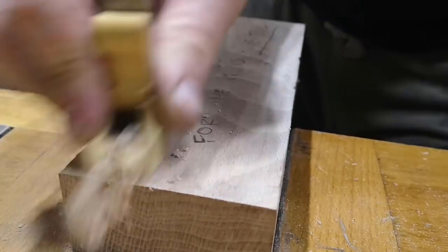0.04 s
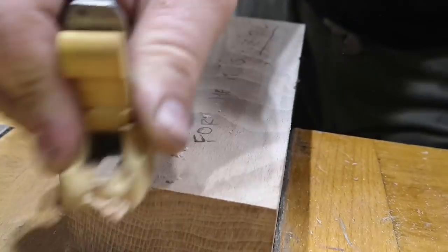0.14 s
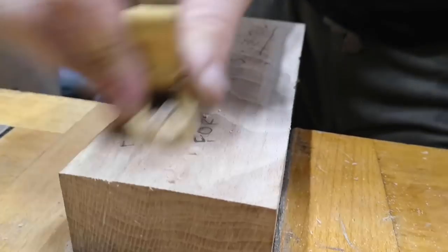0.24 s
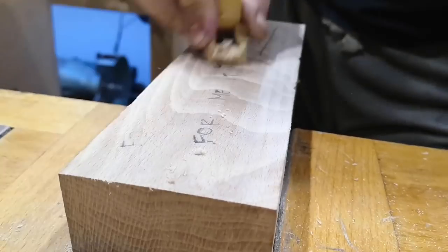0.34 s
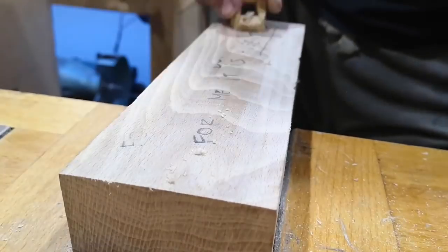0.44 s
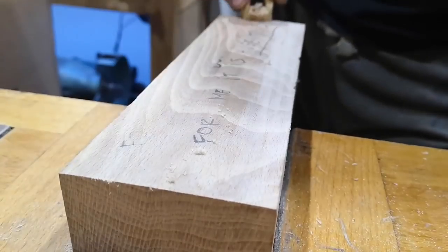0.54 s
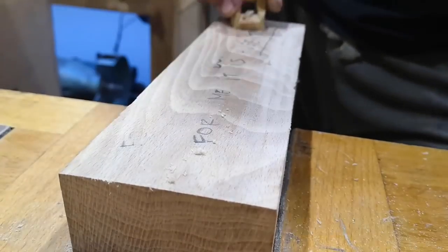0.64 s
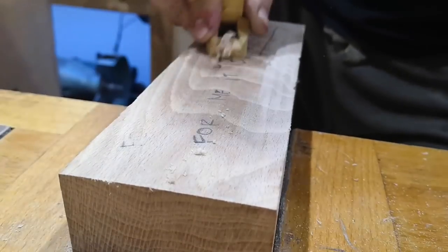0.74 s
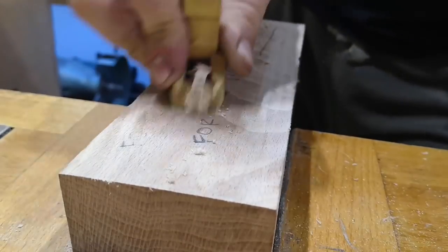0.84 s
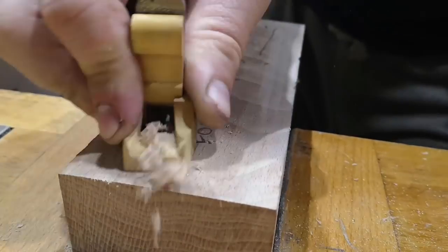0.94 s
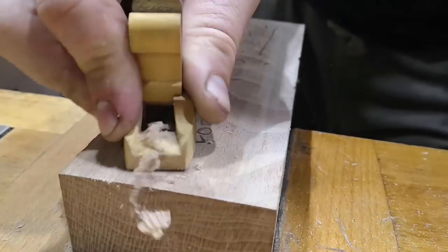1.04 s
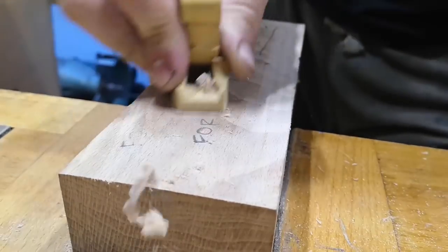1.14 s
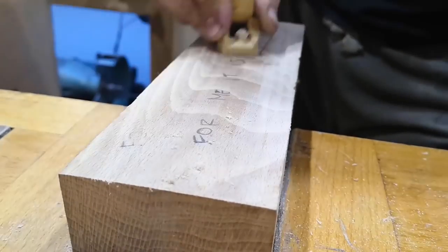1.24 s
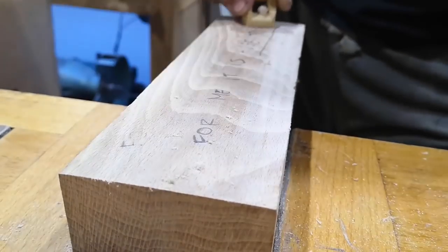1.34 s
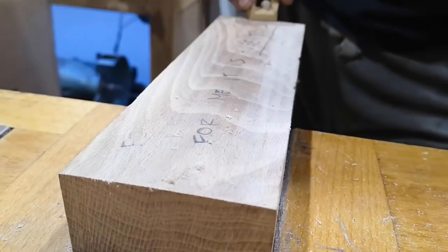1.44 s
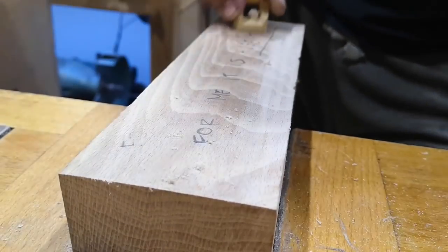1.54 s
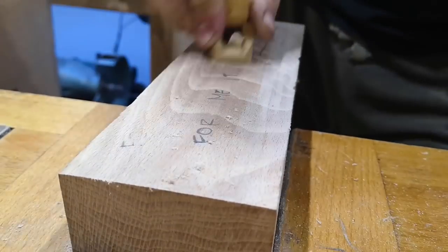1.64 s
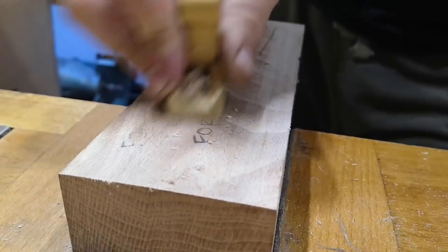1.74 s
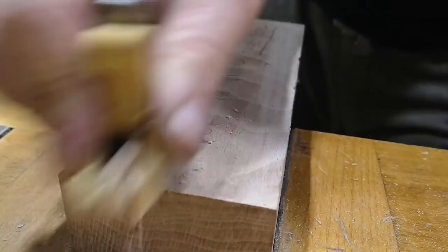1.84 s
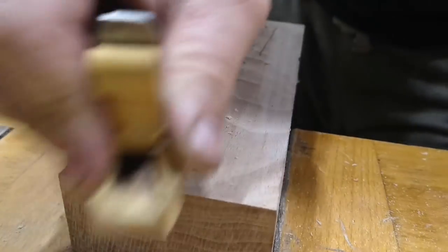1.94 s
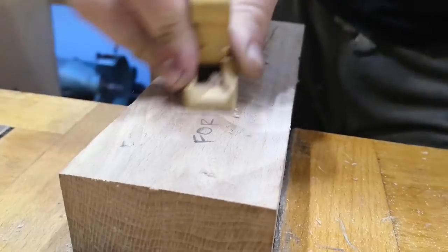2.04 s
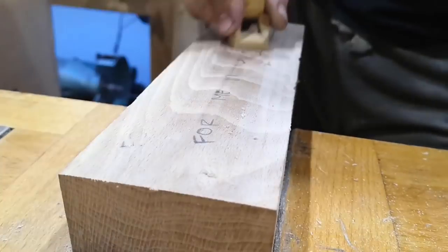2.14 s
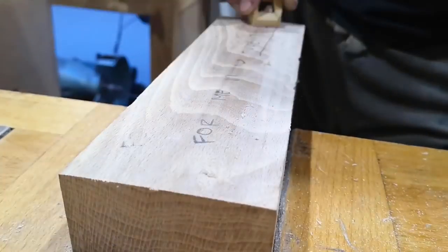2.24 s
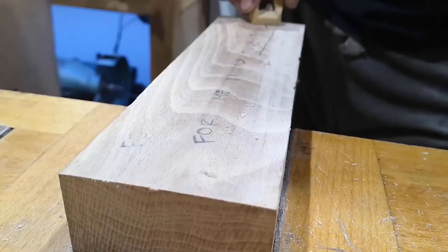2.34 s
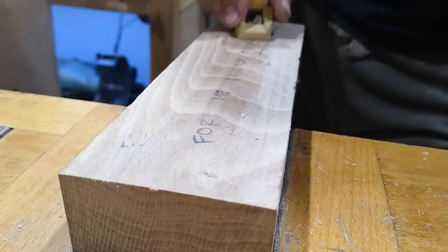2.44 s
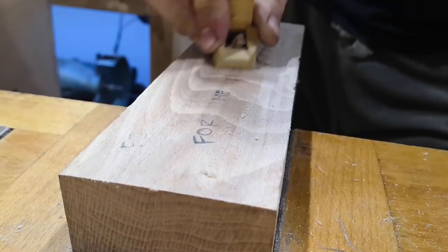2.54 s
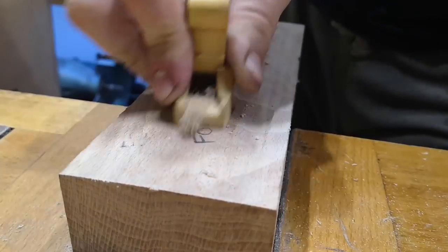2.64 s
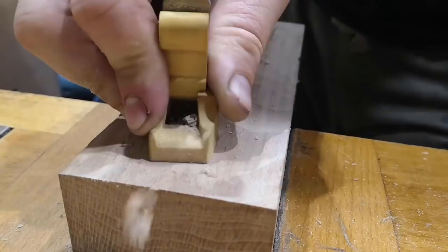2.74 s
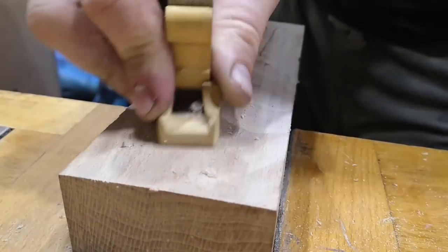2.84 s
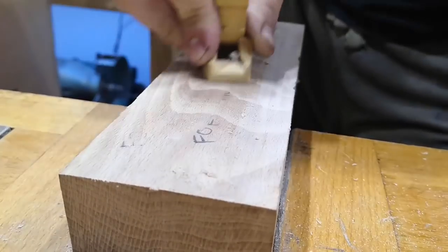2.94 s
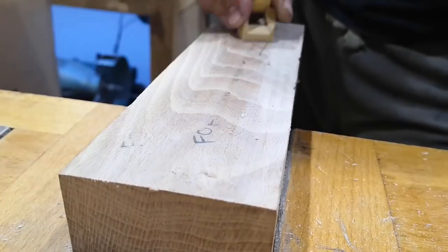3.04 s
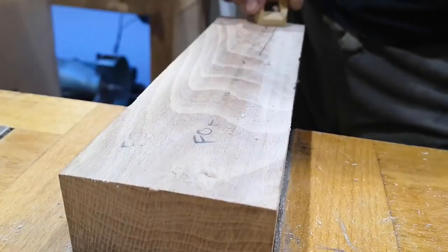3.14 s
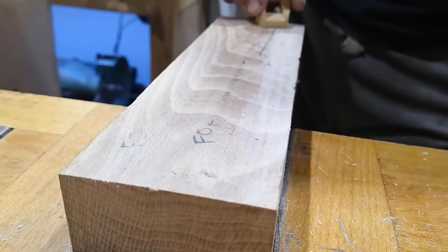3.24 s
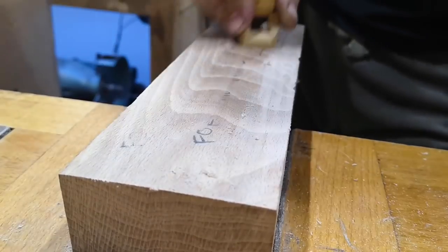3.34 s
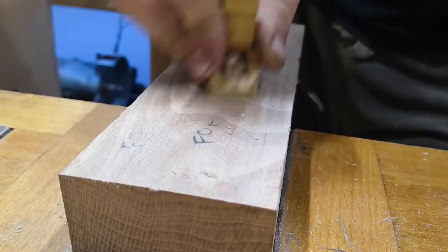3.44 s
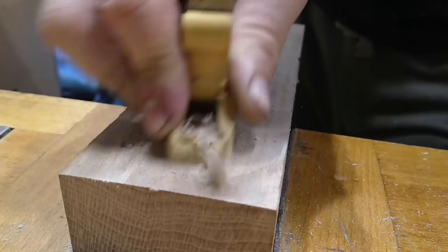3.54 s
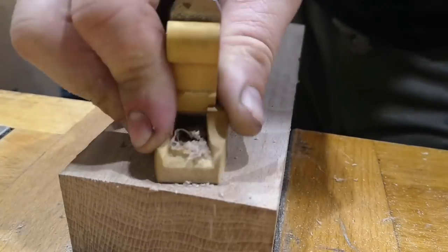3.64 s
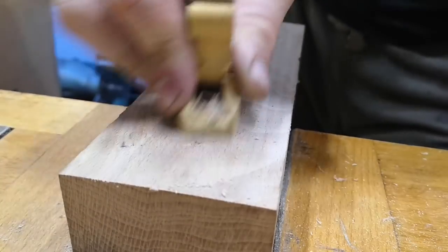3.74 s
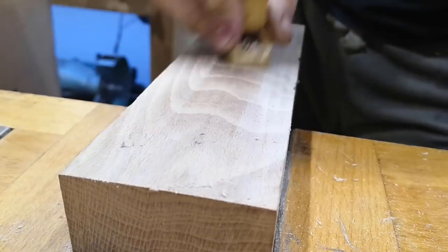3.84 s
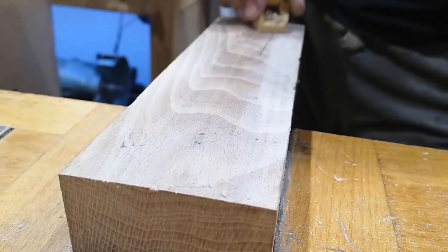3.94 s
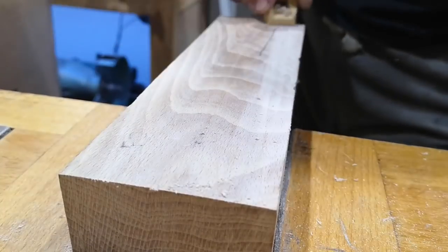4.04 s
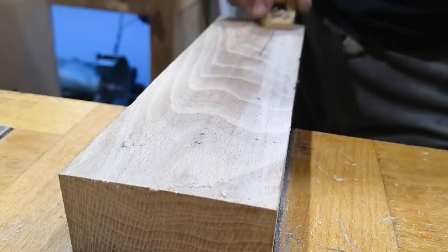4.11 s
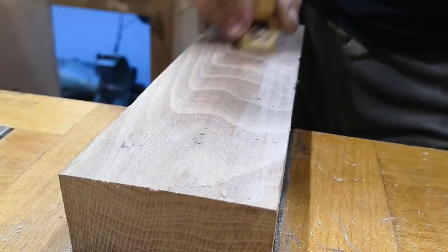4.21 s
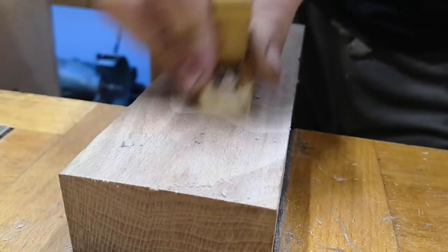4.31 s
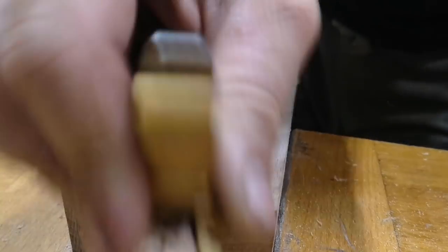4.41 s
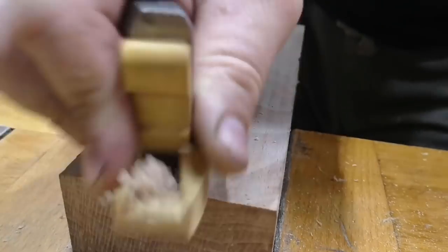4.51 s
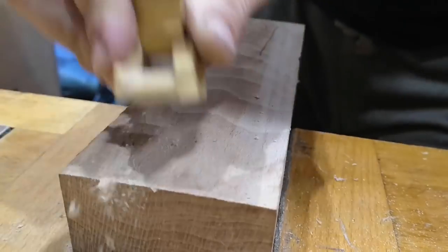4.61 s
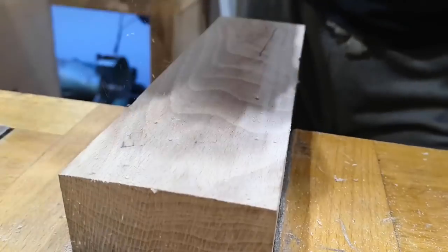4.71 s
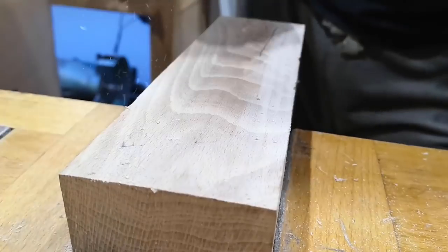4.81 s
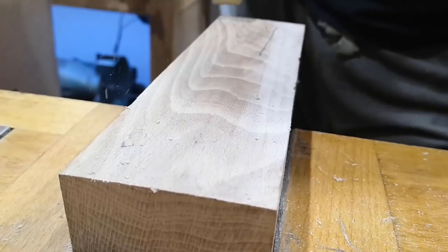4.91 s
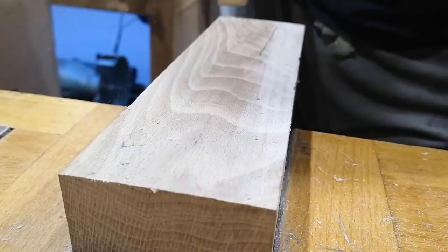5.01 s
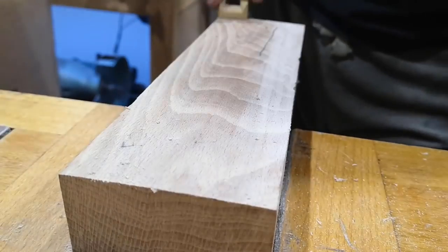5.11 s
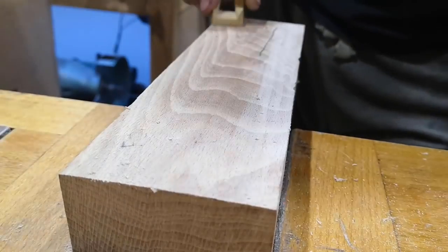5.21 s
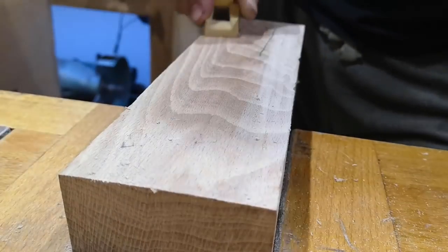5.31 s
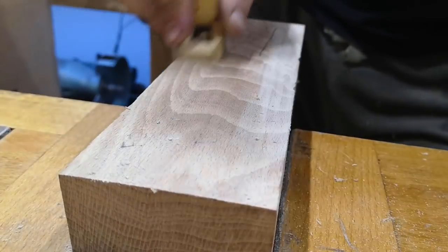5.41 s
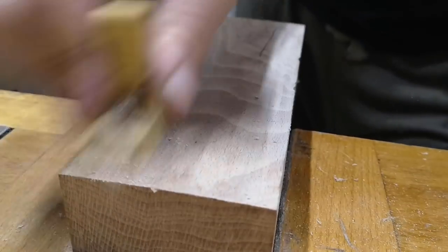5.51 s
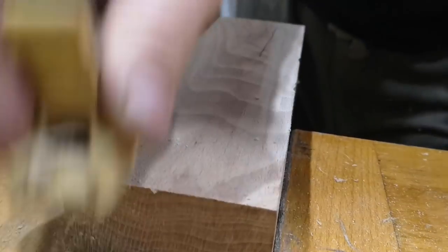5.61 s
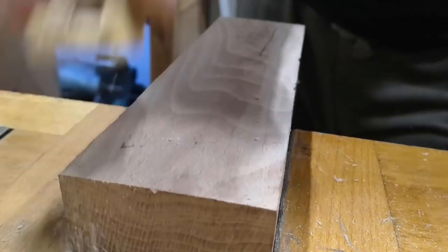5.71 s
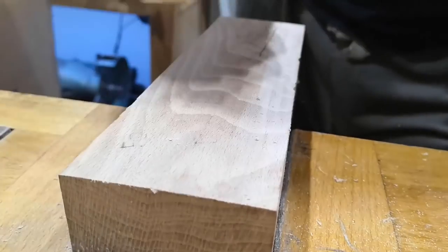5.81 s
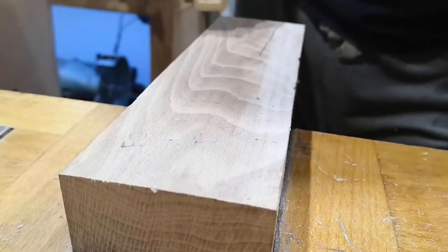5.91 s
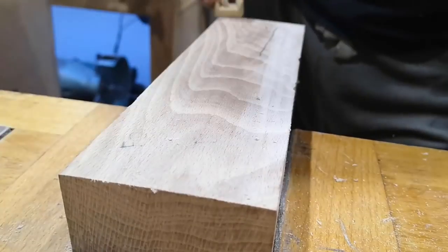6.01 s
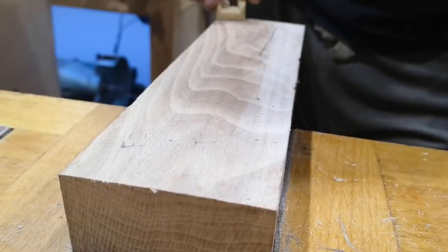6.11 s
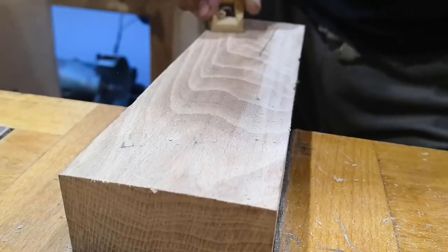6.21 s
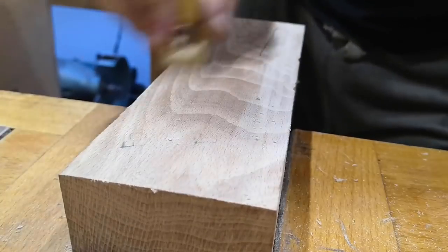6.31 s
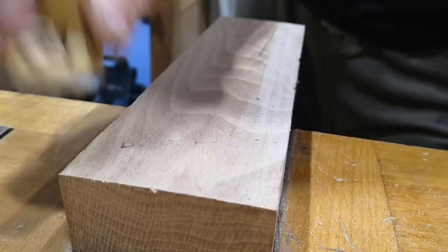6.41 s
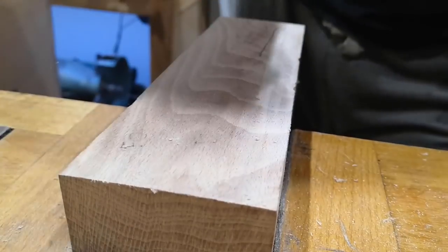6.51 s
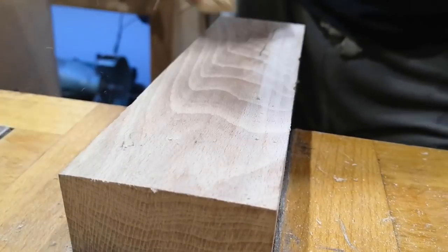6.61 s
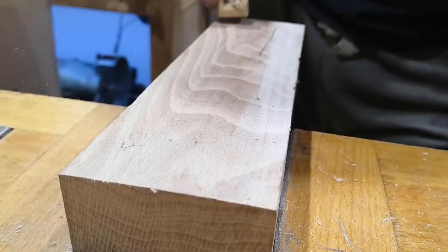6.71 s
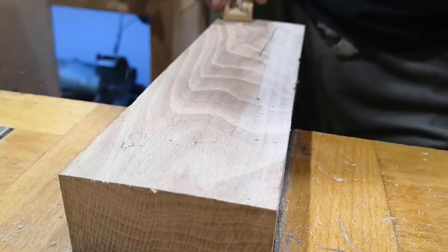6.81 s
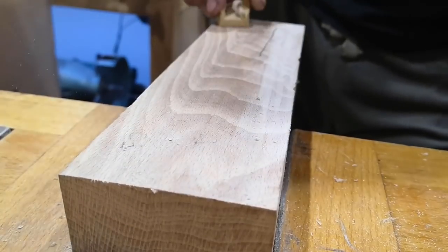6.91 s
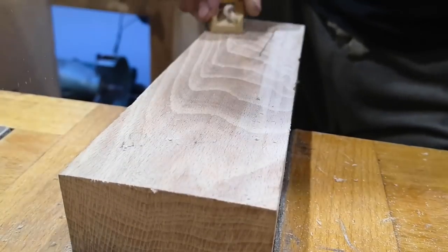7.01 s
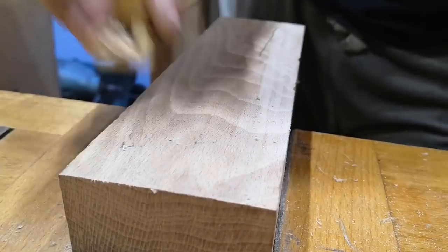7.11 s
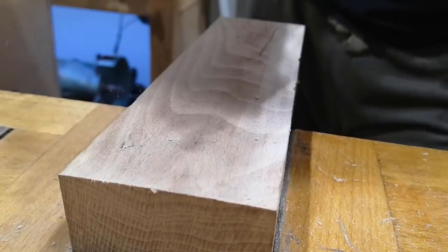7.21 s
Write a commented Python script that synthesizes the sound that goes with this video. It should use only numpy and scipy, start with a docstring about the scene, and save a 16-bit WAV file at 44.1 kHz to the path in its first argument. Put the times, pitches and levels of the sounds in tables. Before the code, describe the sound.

Rhythmic hand planing on a thick hardwood board, heard very near. Strokes approach the microphone with sizzling, tearing fibres and a grinding, faintly singing sole; lighter return drags sit between them. A strong short squeak and tumbling knocks end the back-and-forth run, then the plane taps down and cuts quickly three times, with small gaps. Dry room with short reflections, dull bench thumps and very faint air.

```python
"""A bright, hissing scrape opens: a small wooden hand plane cuts a hardwood board towards a close microphone.
Long strokes alternate with drags back, then the plane runs off the end, knocks, and is set down three times
for short single strokes. Snapping fibres are noise clicks ringing the blade; the rubbing sole is coloured noise
with wavering tones that sing and squeak. Knocks are decaying modes with a crack; scuffs, the board's body,
the rumbling bench and faint room air are coloured noise underneath."""
import sys
import numpy as np
from scipy import signal
from scipy.fft import rfft, irfft
from scipy.io import wavfile
from scipy.ndimage import uniform_filter1d, map_coordinates

SR = 44100
rng = np.random.default_rng(int(sys.argv[2]) if len(sys.argv) > 2 else 0)


def bounce(signal):
    """Save signal as a 16-bit WAV file at the path given by the first command-line argument."""
    frames = np.transpose(np.atleast_2d(signal))
    limited = np.clip(frames, -1, 1)
    pcm = np.round(limited * 32767).astype(np.int16)
    wavfile.write(sys.argv[1], SR, pcm)


N = 320166
TIME = np.arange(N) / SR


def undb(db):
    """Decibels to gain."""
    return 10 ** (np.asarray(db) / 20)


def unit(x):
    """Scale to an rms of one."""
    return x / np.sqrt(np.mean(x ** 2))


def ramp(start, length):
    """Rises from 0 to 1 over the given time."""
    return np.clip((TIME - start) / max(length, 1 / SR), 0, 1)


def swell(s, length):
    """A bell-shaped swell around the given moment."""
    exponent = (1.3 * (TIME - s) / length) ** 2
    return np.exp(-np.minimum(exponent, 50))  # never quite zero, so squeaks() can divide by it


def walk(rate):
    """Random levels held 1 / rate s and slewed twice, with an rms of one."""
    hold = int(SR / rate)
    steps = rng.standard_normal(N // hold + 1)[np.arange(N) // hold]
    return unit(uniform_filter1d(uniform_filter1d(steps, hold), hold))


def colour(x, points, size=8192):
    """Causal minimum-phase filter with the given (Hz, dB) outline, made by folding its cepstrum."""
    hz, db = np.transpose(points)
    grid = np.maximum(np.fft.rfftfreq(size, 1 / SR), 1)
    outline_db = np.interp(np.log(grid), np.log(hz), db)
    cepstrum = irfft(np.log(undb(outline_db)))
    cepstrum[1:size // 2] *= 2
    cepstrum[size // 2 + 1:] = 0
    impulse = irfft(np.exp(rfft(cepstrum)))
    return signal.fftconvolve(x, impulse)[:len(x)]


def band(x, hz, kind, order=2):
    """Butterworth low-pass or high-pass."""
    return signal.sosfilt(signal.butter(order, min(hz, SR / 2 - 1), kind, fs=SR, output="sos"), x)


def fibres(per_s, spread_db):
    """Wood fibres catching and letting go: dense clicks of uneven size."""
    caught = rng.random(N) < per_s / SR
    size = rng.standard_normal(N) * undb(spread_db * rng.standard_normal(N))
    return unit(caught * size)


def glide(x, ratio):
    """Shift all resonances of a steady sound by a moving ratio, by reading it faster or slower."""
    return map_coordinates(x, [np.cumsum(ratio) % (N - 1)], order=3, mode="nearest")


def ports(x, lead_samples):
    """Two microphone ports: the left one hears the sound a little earlier."""
    right = map_coordinates(x, [np.arange(N) - lead_samples], order=3, mode="nearest")
    return np.array([x, right])


def room(pair, wet_db, t60, near_db, near_t60=0.029):
    """Quick reflections off bench, hands and apron, then the short tail of the workshop."""
    t = TIME[:SR // 2]
    tails = []
    for gain_db, decay in ((near_db, near_t60), (wet_db, t60)):
        shape = undb(-60 * t / decay) * (t > .001)
        tails.append(undb(gain_db) * rng.standard_normal((2, len(t))) * shape / np.linalg.norm(shape))
    mid, side = sum(tails)
    side = band(side, 220, "high", order=1)  # long waves reach both ports alike
    # the left port's sound feeds the reflections of both ports
    wet = [signal.fftconvolve(pair[0], mid + sign * side)[:N] for sign in (1, -1)]
    return pair + np.array(wet) / np.sqrt(2)


def moving_room(pair, place, wet_db, t60, near_db, count=5):
    """Each spot along the board has its own reflections; the plane passes from one set to the next."""
    spot = np.clip(place, 0, 1) * (count - 1)
    shares = np.sqrt([np.maximum(1 - abs(spot - k), 0) for k in range(count)])
    return pair + sum(room(pair * share, wet_db, t60, near_db) - pair * share for share in shares)


# Cutting strokes towards the microphone. Each row: start in seconds, time to full depth in seconds,
# easing off in seconds, run-out in seconds, level at the bite in dB, level at full depth in dB,
# drop as the shaving breaks in dB, jolt of the bench in dB, singing of the sole in dB. Levels are relative.
PUSHES = [(-.24, .27, .075, 0.13, -7, -16.5, -11.5, -39.5, -40),
          (.664, 0.23, .068, 0.11, -26.5, -16, 0, -34, -37.5),
          (1.549, 0.24, .057, .16, -25, -15, -10.5, -34, -36),
          (2.413, 0.27, .05, 0.13, -28, -17, -2.5, -39.5, -36.5),
          (3.308, 0.24, .07, 0.12, -25, -17.5, -2.5, -40.5, -34),
          (4.168, 0.2, .008, 0.19, -25, -19.5, -13.5, -29.5, -34),
          (5.247, .282, .004, .18, -35.5, -17.5, -12.5, -33.5, -43),
          (6.2, 0.18, .005, .15, -34.5, -20, -8, -37, -43),
          (6.916, 0.18, .008, 0.15, -44.5, -25.5, -7.5, -38, -41)]
BITE_S, BREAK_S = 0.033, .008  # the edge enters the wood; the shaving breaks off
DIG_POWER, EASE_DB_PER_S = 1.49, 104.5  # bend of the level while digging; fall as the hand eases off
STOP_POWER = 4.33  # the scrape dies as this power of the falling speed


def push_gain(start, dig, ease, run_out, bite_db, full_db, drop_db):
    """The edge bites, digs deeper, eases off; the shaving breaks and the plane slides to rest."""
    let_go = start + dig + ease
    db = bite_db + (full_db - bite_db) * ramp(start, dig) ** DIG_POWER
    db = db - EASE_DB_PER_S * ease * ramp(start + dig, ease)
    db = db + drop_db * ramp(let_go, BREAK_S)
    speed = 1 - ramp(let_go, run_out)
    return undb(db) * ramp(start, BITE_S) * speed ** STOP_POWER


# The plane dragged back over the board. Each row: start in seconds, length in seconds,
# relative level in dB, relative singing of the sole in dB.
RETURNS = [(0.229, 0.37, -29, -40.5), (1.131, 0.36, -29, -42.5), (1.999, 0.37, -30, -38),
           (2.904, 0.35, -29.5, -40.5), (3.75, 0.38, -29, -34.5)]
RETURN_ATTACK_S, RETURN_SAG_DB_PER_S, RETURN_STOP_S = 0.075, 28.5, 0.1
CREEP_S, CREEP_DB = 0.033, -31  # the sole shifts a little just before it is drawn back


def return_gain(start, length, db):
    """Dragged back, the edge only skims: it creeps, gathers speed, lightens as it goes and slows to rest."""
    sag_db = RETURN_SAG_DB_PER_S * length * ramp(start + RETURN_ATTACK_S, length)
    creep = undb(CREEP_DB) * ramp(start - CREEP_S, CREEP_S / 2)
    speeding = creep + ramp(start, RETURN_ATTACK_S)
    slowing = 1 - ramp(start + length - RETURN_STOP_S, RETURN_STOP_S)
    return undb(db - sag_db) * speeding * slowing ** STOP_POWER


def scrape_gain(uneven_db=0.84):
    """Strength of the scraping over all strokes, a little uneven with the grain of the wood."""
    pushes = sum(push_gain(*row[:7]) for row in PUSHES)
    returns = sum(return_gain(*row[:3]) for row in RETURNS)
    return (pushes + returns) * undb(uneven_db * walk(40))


def rub_gain(scrape, full_db=-36):
    """The sole's rub saturates: near full strength once the scrape is well above full_db."""
    return scrape / np.hypot(scrape, undb(full_db))


def travel(turn_s=.06):
    """Place on the board, 0 far to 1 near: each push runs its length, and the plane goes back in between."""
    turns = []
    for start, dig, ease, run_out, *_ in PUSHES:
        turns.append((start - turn_s, 0))  # the hand turns round shortly before the edge bites
        turns.append((start + dig + ease + run_out, 1))
    moments, places = np.transpose(turns)
    return np.interp(TIME, moments, places)


# Colour of the ringing blade. Each row: frequency in Hz, relative level in dB per Hz.
BLADE = [(1500, -38), (2300, -17), (3050, -24), (4200, -18.5), (5100, -8), (5900, -6.5), (6550, 1),
         (7000, -5), (7500, -7), (8300, -14.5), (9100, -19.5), (10100, -32), (13000, -31.5), (15200, -48.5)]


def blade(place, pushing, scrape):
    """Fibres snap at the edge and ring the blade, whose ring wanders; nearing pushes tear more broadly."""
    steady = unit(colour(fibres(per_s=9000 + 6000 * place, spread_db=0.5), BLADE))
    ring = glide(steady, 1 + 0.03 * (.5 - place) + .008 * walk(15))
    tear = band(fibres(per_s=1900, spread_db=5.0), 3200, "high")
    tear = unit(band(tear, 5500, "low", order=3))
    torn = tear * pushing * undb(-35.5 + 30 * place)
    hiss = (ring + torn) * scrape * undb(.5 * walk(120))
    pair = undb(-3.0) * ports(hiss, 1.79 + 5.3 * place)
    return moving_room(pair, place, wet_db=-17.5, t60=0.2, near_db=-1.55, count=9)


# Colours of the sole on the push and on the return. Each row: frequency in Hz, relative level in dB per Hz.
SOLE_PUSH = [(60, -36), (170, -9.5), (260, -11), (340, -8), (750, -3.5), (920, 1.5), (1080, -9),
             (1370, 5.5), (1750, 3), (2200, 3), (3000, -10), (6000, -20)]
SOLE_RETURN = [(60, -14), (170, -17), (400, -9), (750, -7), (1000, 3.5), (1200, 1), (1530, 9.5), (1900, 6),
               (2300, 0), (3000, -8), (6000, -22.5)]


def sole(place, pushing, sliding):
    """The sole grinds over the board; its resonances wander, higher on the light return and at the far end."""
    push = unit(colour(fibres(per_s=3200, spread_db=2.5), SOLE_PUSH)) * undb(-37.5 + 0.37 * place)
    back = unit(colour(fibres(per_s=4700, spread_db=2.5), SOLE_RETURN)) * undb(-33.5 - 4.6 * place)
    steady = pushing * push + (1 - pushing) * back
    rub = glide(steady, 1 + .16 * (.5 - place) + .025 * walk(16)) * sliding * undb(walk(49))
    pair = undb(-2.5) * ports(rub, 6.2 + 1.5 * place)
    return moving_room(pair, place, wet_db=-5, t60=0.097, near_db=1.5, count=3)


def singing(place, pushing, sliding, push_hz=1365, return_hz=1490):
    """Friction keeps one resonance of the sole singing unsteadily, most near mid-board."""
    hz = pushing * push_hz + (1 - pushing) * return_hz
    hz = hz * (1 + .14 * (.5 - place) + .022 * walk(11))
    phase = 2 * np.pi * np.cumsum(hz) / SR
    tone = walk(260) * np.sin(phase) + walk(260) * np.cos(phase)
    strokes = sorted((row[0], row[-1]) for row in [*PUSHES, *RETURNS])
    starts, stroke_db = np.transpose(strokes)
    level_db = stroke_db[np.searchsorted(starts, TIME) - 1] - 35 * (place - .45) ** 2
    pair = ports(tone * sliding * undb(level_db), 4)
    return room(pair, wet_db=-15.5, t60=.2, near_db=-17.5)


# Stick-slip squeaks of the sole. Each row: moment in seconds, centre pitch in Hz, relative peak level in dB,
# length scale of the swell in seconds.
SQUEAKS = [(1.243, 1445, -25.5, 0.017), (1.71, 1373, -22.5, .018), (2.617, 1362, -17.5, 0.02),
           (3.347, 1363, -28.5, 0.03), (3.449, 1411, -22, 0.047), (3.929, 1544, -26.5, .05),
           (4.251, 1373, -16.5, 0.053), (4.305, 1355, -10, 0.011), (4.322, 1332, -3, .008)]


def squeaks(stutter_db=2):
    """Stick-slip locks on to the sole's resonance, nearly a pure tone that stutters as it catches and slips."""
    swells = np.array([undb(db) * swell(s, length) for s, _, db, length in SQUEAKS]) ** 2
    power = swells.sum(axis=0)
    pitch = np.array(SQUEAKS)[:, 1] @ swells / power  # the strongest squeak sets the pitch
    hz = pitch * (1 + .012 * walk(250) + 0.012 * walk(50))
    phase = 2 * np.pi * np.cumsum(hz) / SR
    wave = np.sin(phase) + undb(-27.5) * np.sin(2 * phase)
    stutter = undb(stutter_db * np.minimum(walk(130), 1))
    tone = np.sqrt(power) * stutter * wave
    return room(undb(-1.0) * ports(tone, 0.85), wet_db=-7.5, t60=0.23, near_db=-26.0)


# The plane knocks on the board. Each row: moment in seconds, relative level in dB,
# sharpness of the contact in Hz, relative jolt of the bench in dB.
KNOCKS = [(0.359, -33.5, 2500, -63), (0.667, -34.5, 2500, -49), (1.49, -48.5, 1500, -44),
          (2.045, -41.5, 4000, -56), (4.501, -18, 2800, -36), (4.564, -23.5, 10840, -44),
          (4.58, -16.5, 2380, -65), (5.15, -14.5, 4500, -42), (6.053, -18, 1260, -50.5),
          (6.806, -21, 1050, -53), (6.823, -20.5, 650, -48)]
# Ring of the knocked board and plane, damped by the hands. Each row: centre frequency in Hz,
# relative level in dB, time to fall 60 dB in seconds.
MODES = [(282, -1.5, 0.074), (376.3, -3.5, 0.24), (429.3, -0.5, 0.13), (526.2, -4.5, .17),
         (762.7, -12.5, 0.073), (900, -3.5, 0.077), (1185, 4, 0.05), (1255, 3.5, 0.08), (1428, 4.5, 0.042),
         (1943, -10.5, .1), (2310, -22, .08), (3650, 0, 0.042)]
# Colour of the crack at contact. Each row: frequency in Hz, relative level in dB per Hz.
CRACK = [(60, -5), (200, -0.5), (450, 5.5), (700, 0.5), (900, 1), (1300, 2.5), (2200, -4.5), (3000, -20),
         (3900, 0.5), (5000, -19), (7500, -9), (15000, -31)]


def knocks():
    """Wood meets wood: a short crack and modes that shift from blow to blow; a softer contact is duller."""
    t = TIME[:SR // 2]
    out = np.zeros(N + len(t))
    for s, db, contact_hz, _ in KNOCKS:
        ring = np.zeros(len(t))
        for hz, mode_db, t60 in MODES:
            shifted_hz = hz * rng.normal(1, .012)
            mode = undb(mode_db - 60 * t / t60) * np.sin(2 * np.pi * shifted_hz * t)
            ring += mode * rng.choice([-1, 1])
        decay = undb(-60 * t / 0.02) + undb(-10 - 60 * t / 0.19)
        crack = unit(colour(rng.standard_normal(len(t)), CRACK)) * decay
        blow = band(undb(-16) * ring + undb(-6.0) * crack, contact_hz, "low")
        start = int(s * SR)
        out[start:start + len(t)] += undb(db) * blow
    return room(ports(out[:N], 4.0), wet_db=-3.5, t60=0.18, near_db=-7.5)


# The heel scuffs the board as the plane lifts. Each row: moment in seconds, relative level in dB,
# length scale of the swell in seconds.
SCUFFS = [(4.456, -45.5, 0.04), (5.621, -42, 0.027)]
# Colour of the scuff. Each row: frequency in Hz, relative level in dB per Hz.
SCUFF = [(200, 3), (900, -4.5), (1500, -1), (2800, -21.5), (4500, -3), (5500, -21), (12000, -26)]


def scuffs():
    """The heel brushes the wood in passing: coloured clicks in short swells."""
    swells = sum(undb(db) * swell(s, length) for s, db, length in SCUFFS)
    brush = unit(colour(fibres(per_s=9000, spread_db=3), SCUFF)) * swells
    return room(ports(brush, 2.6), wet_db=-6, t60=0.17, near_db=0.5)


# Colour of the board's body. Each row: frequency in Hz, relative level in dB per Hz.
BOARD = [(80, -17), (180, -7), (260, -8), (310, -9), (380, 4.5), (450, -7), (530, 6), (700, -24),
         (1200, -37)]


def board(place, pushing, sliding, lag_s=.035, push_db=-50, return_db=-48, overhang_db=11):
    """The board's body grumbles after the sliding sole; on the way back it grows towards the loose far end."""
    driven = np.interp(TIME - lag_s, TIME, sliding)
    level_db = pushing * push_db + (1 - pushing) * (return_db - overhang_db * place)
    steady = unit(colour(fibres(per_s=1500, spread_db=0.5), BOARD))
    body = steady * driven * undb(level_db + 1.5 * walk(30))
    return room(ports(body, 4.6), wet_db=-4, t60=.22, near_db=2.5)


# Colour of the bench's rumble. Each row: frequency in Hz, relative level in dB per Hz.
RUMBLE = [(12, -10), (25, 3.5), (42, -4), (65, -5.5), (100, -3.5), (135, -9.5), (185, -4.5), (225, -24),
          (260, -4.5), (320, -30), (700, -50)]
JOLT_RISE_DB_PER_S, JOLT_T60_S, ROCK_T60_S = 179.5, 0.38, .9


def bench(place, grip):
    """The bench rumbles under the hands, strains up to each let-go, jolts there and at knocks, and rocks on."""
    let_goes = [(start + dig + ease, db) for start, dig, ease, _, _, _, _, db, _ in PUSHES]
    jolts, rocking = np.zeros(N), np.zeros(N)
    for s, db in let_goes:
        jolts += undb(db + JOLT_RISE_DB_PER_S * np.minimum(TIME - s, 0)) * (TIME < s)
    for s, db in let_goes + [(s, db) for s, _, _, db in KNOCKS]:
        age = np.maximum(TIME - s, 0)
        start = undb(db) * (TIME >= s)
        jolts += start * undb(-60 * age / JOLT_T60_S)
        rocking += start * undb(-5 - 60 * age / ROCK_T60_S)
    shake = unit(colour(fibres(per_s=900, spread_db=5.5), RUMBLE))
    held = grip * undb(-50 + 0.77 * place + 2.5 * walk(20))
    dry = shake * (jolts + held) + band(shake, 46, "low") * rocking
    return room(ports(dry, 3.2), wet_db=-12.0, t60=.2, near_db=-16.0)


# Colour of the room air. Each row: frequency in Hz, relative level in dB per Hz.
WORKSHOP = [(59, -37), (100, 5), (443, -26.5), (558, -28.5), (1960, -23), (15000, -44)]


def workshop():
    """Faint steady air of the room: noise shared by both ports, with separate noise in each above the bass."""
    outline = [(23, -23)] + list(WORKSHOP)
    shared, left, right = (unit(colour(rng.standard_normal(N), outline)) for _ in range(3))
    return undb(-69) * (shared + band(np.array([left, right]), 400, "high", order=1))


def scene(grip_s=0.29, shift_db=-20.5):
    """All that the plane sets ringing, over the quiet room."""
    place, scrape = travel(), scrape_gain()
    sliding = rub_gain(scrape)
    # the hands stay on the board between strokes, and the sole shifts faintly under them
    grip = uniform_filter1d(rub_gain(scrape, full_db=-35.5), int(grip_s * SR))
    pushing = uniform_filter1d((np.gradient(place) >= 0) * 1., SR // 25)  # 1 towards the microphone, 0 back
    plane = blade(place, pushing, scrape)
    plane = plane + sole(place, pushing, sliding + undb(shift_db) * grip)
    plane = plane + singing(place, pushing, sliding) + squeaks()
    touches = knocks() + scuffs()
    return plane + touches + board(place, pushing, sliding) + bench(place, grip) + workshop()


# Colour difference between the two ports. Each row: frequency in Hz, left minus right in dB.
PORT_SHADE = [(550, -1), (860, 0), (1150, -2), (1600, 5), (2100, -4.5), (2700, 1.5), (5000, 6.5),
              (6000, 2.5), (7400, 6), (10000, -2.5), (15000, -0.5)]


def record(dry, top_hz=15200):
    """Each port has its own colour; a steep low-pass cuts the top."""
    shaded = [colour(x, [(hz, sign * db / 2) for hz, db in PORT_SHADE]) for x, sign in zip(dry, (1, -1))]
    return signal.sosfilt(signal.ellip(10, .2, 80, top_hz, fs=SR, output="sos"), shaded)


dry = scene()
out = record(dry)
bounce(out)
```